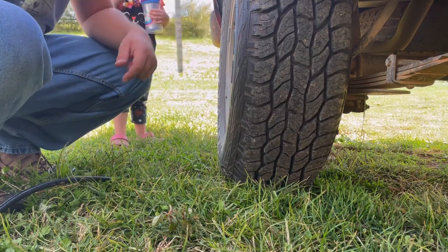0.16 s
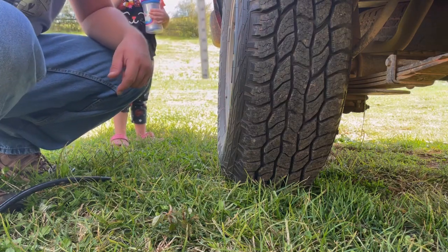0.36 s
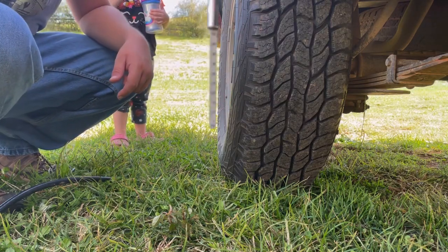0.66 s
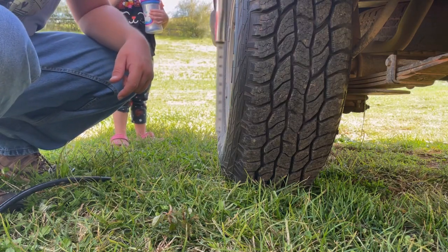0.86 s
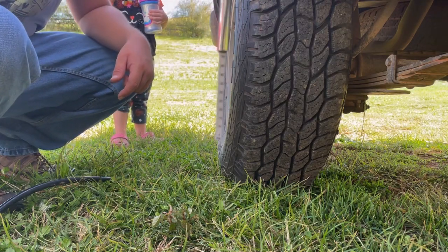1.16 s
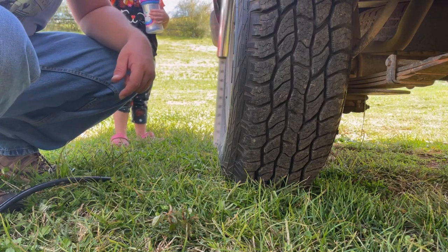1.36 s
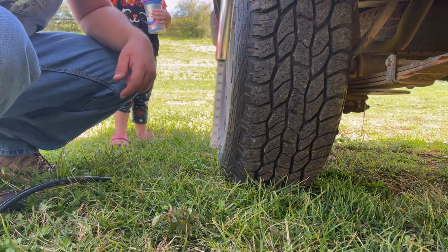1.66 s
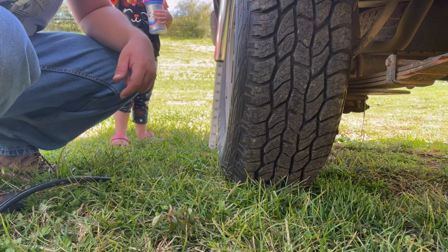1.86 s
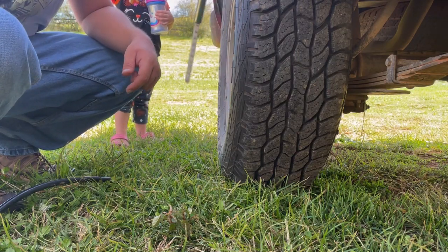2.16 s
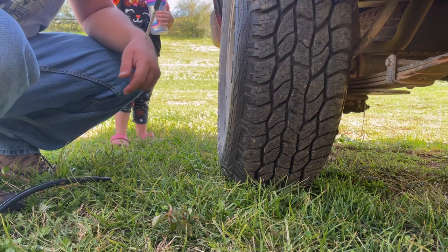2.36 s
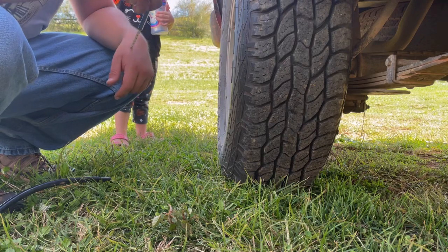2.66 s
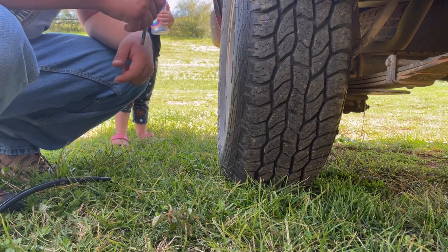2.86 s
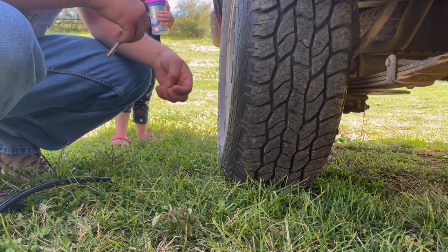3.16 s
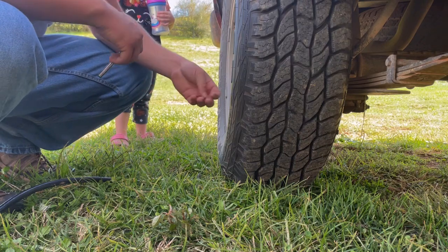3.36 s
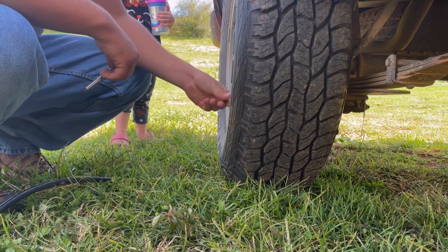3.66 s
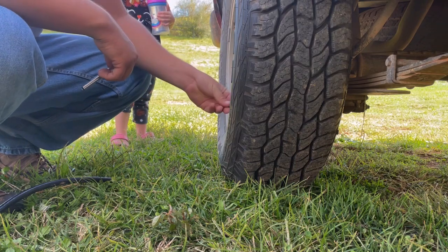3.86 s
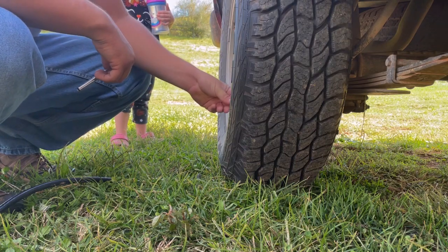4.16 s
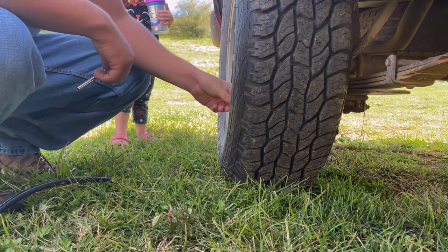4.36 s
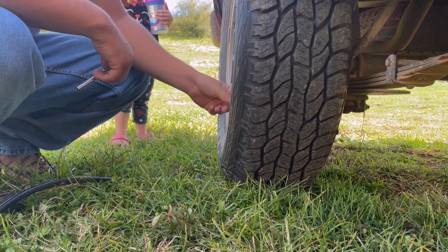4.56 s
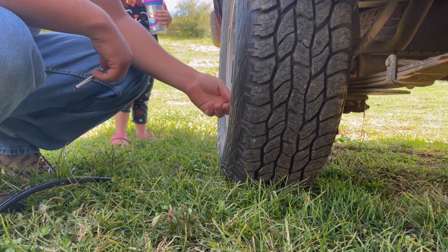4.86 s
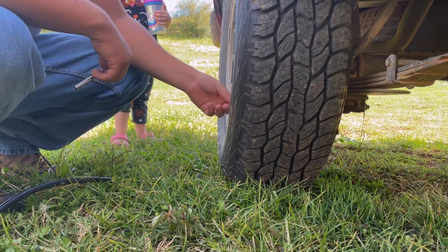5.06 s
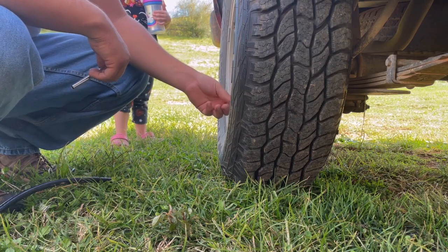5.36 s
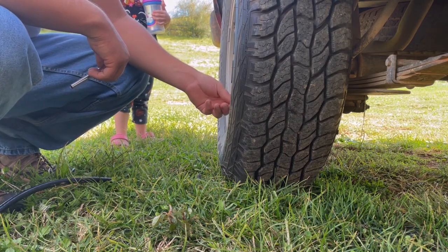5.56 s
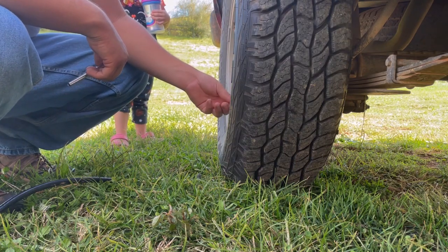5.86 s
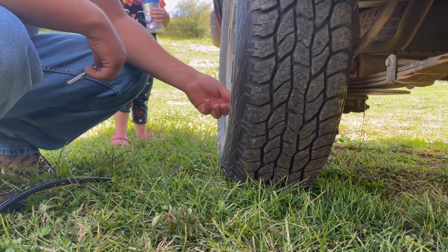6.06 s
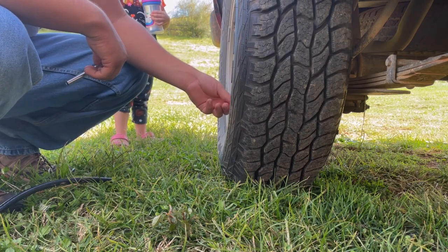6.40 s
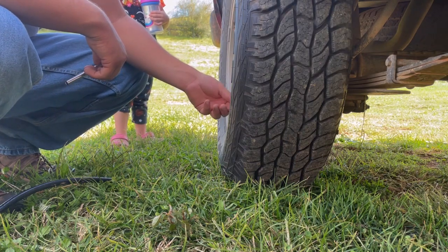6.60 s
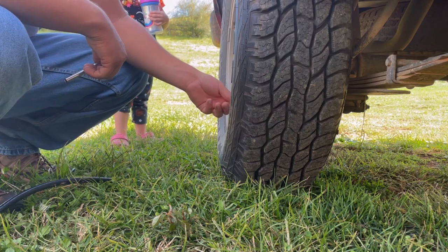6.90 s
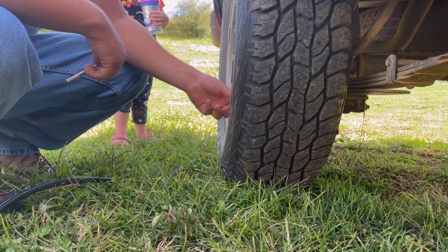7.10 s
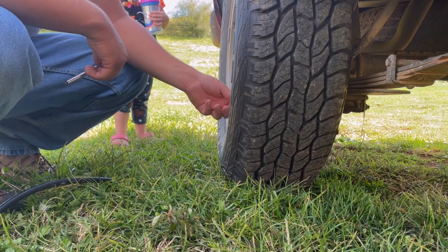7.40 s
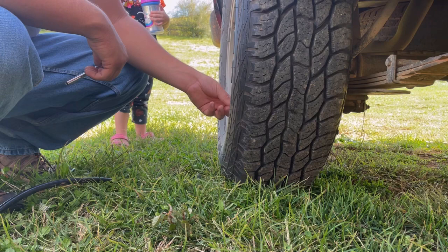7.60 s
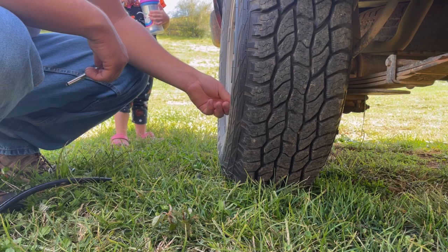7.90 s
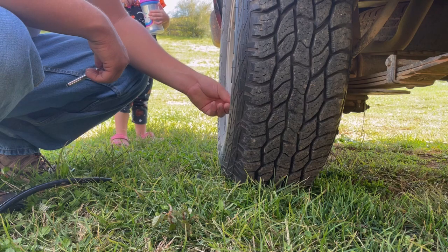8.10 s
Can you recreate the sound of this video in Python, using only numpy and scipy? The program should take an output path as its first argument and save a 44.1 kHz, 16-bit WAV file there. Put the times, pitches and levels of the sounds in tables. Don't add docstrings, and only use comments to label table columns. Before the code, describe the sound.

From 0 to about 8 seconds a small piston air compressor runs steadily on grass, close to a phone and slightly left. It turns about 47 times a second, giving a low, dense hum near 94 Hz with stacked buzzing overtones, housing rumble, loose rattle and pulsing valve and fan hiss; speed barely sags. Wind puffs the microphone at 0.15, strongest at 0.6, again at 1.4 and 2.0. One midrange tone near 600 Hz swells slightly at 0.55 and 1.55. Five tiny falling chirps near 4.4 kHz quicken past from 1.34 to 1.54, growing louder. A faint, very high insect rasp sings from 2.3 to 4.5, with dry ticks around 3.0 to 3.2 and 3.9 to 4.0. As a person leans in, roughly 2 to 3, the buzz brightens subtly. A short puff comes at 3.9, lone chirps at 5.2 and 6.3, soft gusts near 5.9 and 7, and fainter rasping from 7.0 to 8.6. Faint field hiss underlies everything.

```python
import sys
import numpy as np
from scipy import signal
from scipy.fft import rfft, irfft, next_fast_len
from scipy.io import wavfile
from scipy.ndimage import uniform_filter1d

SR = 44100
rng = np.random.default_rng(int(sys.argv[2]) if len(sys.argv) > 2 else 0)


def int16_out(signal):
    q = np.round(np.clip(np.atleast_2d(signal).T, -1, 1) * 32767)
    wavfile.write(sys.argv[1], SR, q.astype(np.int16))


def gain_from_decibels(decibels):
    exponent = np.asarray(decibels, float) / 20
    return 10 ** exponent


N = 363384


def unit(x):
    return x / np.sqrt(np.mean(np.abs(x) ** 2) + 1e-20)


def along(points, hz):
    f, v = np.transpose(points)
    return np.interp(np.log(hz + 1), np.log(f + 1), v)


def curve(rows):
    return np.interp(np.arange(N) / SR, *np.transpose(rows))


def wobble(rate):
    knots = rng.standard_normal(400)
    return np.interp(np.arange(N) * (min(rate, 40) / SR), np.arange(len(knots)), knots)


def filtered(x, response):
    m = next_fast_len(N + 8192)
    return irfft(rfft(x, m) * response(np.fft.rfftfreq(m, 1 / SR)), m)[..., :N]


# frequency in Hz, lead in radians.
LEFT_LEAD = [(0, 0), (340, -0.5), (690, -2.1), (950, -1.4), (1810, -1.4), (2150, -0.5), (2930, -1.5),
             (3620, -2.0), (3880, -0.6), (4390, -1.7), (4740, -1.4), (5680, -3.1), (6550, -2.1),
             (6980, -2.8)]
# frequency in Hz, left over right in dB.
LEFT_LEAN = [(60, -3), (100, -1), (170, -3.5), (290, 3.5), (490, 2), (830, -1.5), (1400, 4.5), (2370, 9),
             (4010, -3), (6780, 1)]
# frequency in Hz, likeness from 0 to 1.
LIKENESS = [(60, 1), (250, 0.98), (700, 0.66), (2500, 0.25), (6000, 0.42)]


def rush(spectrum, throb):
    common, differing = rng.standard_normal((2, N)) * throb

    def turn(hz):
        return np.arccos(np.clip(along(LIKENESS, hz), 0, 1)) / 2

    def port(hz, side):
        lean = gain_from_decibels(side * along(LEFT_LEAN, hz) / 2)
        return gain_from_decibels(along(spectrum, hz)) * lean * np.exp(.5j * side * along(LEFT_LEAD, hz))

    ports = []
    for side in (1, -1):
        same = filtered(common, lambda hz: np.cos(turn(hz)) * port(hz, side))
        other = filtered(differing, lambda hz: np.sin(turn(hz)) * port(hz, side))
        ports.append(same + side * other)
    return unit(np.array(ports))


# frequency in Hz, level in dB.
HISS_SHARED = [(6000, -120), (7000, -14), (8300, -12), (8800, -15.5), (9400, -12), (11000, -13),
               (12500, -16), (13600, -21), (14300, -27), (15500, -25), (16500, -120)]
# frequency in Hz, level in dB.
HISS_DIFFERING = [(6000, -120), (7200, -7), (7900, 1.5), (8500, 1.5), (9300, -9), (10300, -17),
                  (11300, -32), (12500, -18), (14000, -15), (15500, -10), (16500, -120)]


def air():
    mid = filtered(rng.standard_normal(N), lambda hz: gain_from_decibels(along(HISS_SHARED, hz) - 50.8))
    side = filtered(rng.standard_normal(N), lambda hz: gain_from_decibels(along(HISS_DIFFERING, hz) - 50.5))
    return np.array([mid + side, mid - side])


# start in seconds, end in seconds, level in dB.
BOUTS = [
    (2.3, 4.52, -67.5),
    (7.0, 7.6, -74),
    (7.5, 8.6, -70),
]


def insect_rasp():
    t = np.arange(N) / SR
    beat = gain_from_decibels(7 * np.cos(2 * np.pi * 60 * t + 1.5 * wobble(8)) + 1.5 * wobble(20))
    rasp = filtered(rng.standard_normal(N) * beat, lambda hz: np.exp(-((hz - 15600) / 350) ** 2))
    swell_s = .15
    bouts = sum(gain_from_decibels(db) * np.clip(np.minimum(t - a, b - t) / swell_s, 0, 1) for a, b, db in BOUTS)
    chorus = gain_from_decibels(-80 + 3 * wobble(5))
    return (bouts + chorus) * unit(rasp) * np.array([[1.2], [-.3]])


# time in seconds, peak level in dB.
TICKS = [
    (2.9934, -60),
    (3.0729, -56),
    (3.1587, -58),
    (3.8736, -58),
    (4.0257, -59),
]


def insect_ticks():
    t = np.arange(N) / SR
    snaps = sum(gain_from_decibels(db) * np.exp(-((t - s) / 0.0017) ** 2) for s, db in TICKS) * rng.standard_normal(N)
    return filtered(snaps, lambda hz: 2.8 * np.exp(-((hz - 14500) / 1800) ** 2)) * np.array([[1.3], [.2]])


# time in seconds, peak level in dB, pitch in Hz.
CHIRPS = [
    (1.3428, -49, 4490),
    (1.3927, -46, 4290),
    (1.4386, -43.5, 4500),
    (1.488, -42, 4370),
    (1.5404, -40, 4400),
    (5.1771, -43, 4500),
    (6.315, -41, 4360),
]


def chirps():
    t = np.arange(N) / SR
    out = np.zeros((2, N))
    for s, db, hz in CHIRPS:
        u = t - s - .002
        whistle = np.sin(2 * np.pi * u * ((hz + 4420) / 2 - 8000 * u))
        out += gain_from_decibels(db - 1) * np.exp(-(u / .0035) ** 2) * whistle * np.array([[1.1], [.9]])
    return out


# middle in seconds, half length in seconds, peak level in dB.
GUSTS = [
    (.15, 0.2, -35),
    (.62, 0.32, -27),
    (1.4, 0.28, -35),
    (2.0, 0.22, -34),
    (3.1, 0.76, -42),
    (3.948, 0.22, -35),
    (5.9, .35, -40),
    (7.0, .5, -41),
]


def wind():
    shape = [(25, -41), (45, -9), (70, 1.0), (90, 3.5), (140, -9.5), (300, -120)]  # (Hz, dB)
    t = np.arange(N) / SR
    calm = gain_from_decibels(-5 - 61.5)
    gusts = calm + sum(gain_from_decibels(db - 5.5) * np.exp(-((t - s) / half) ** 2) for s, half, db in GUSTS)
    buffet = rush(shape, 1)
    apart = 0.25 * buffet[:, ::-1] * [[1], [-1]]
    return gusts * unit(gain_from_decibels(0.73 * wobble(13)) * (buffet + apart))


# frequency in Hz, level in dB per Hz.
HOUSING = [(15, -30), (25, -24), (43, -34), (69, -7), (96, -6.5), (115, -4.5), (141, -16), (204, -4.5),
           (237, 1), (277, -13), (339, -4), (430, -14), (466, -18), (518, -19), (600, -27.5), (780, -59),
           (1320, -120)]


def housing_rumble():
    return gain_from_decibels(-36.5) * gain_from_decibels(0.66 * wobble(6.5)) * rush(HOUSING, 1)


def clumpy(x):
    z = signal.stft(x, nperseg=512)[2]
    field = uniform_filter1d(rng.standard_normal(z.shape[1:]), size=4, axis=0)
    field = uniform_filter1d(field, size=6, axis=1)
    return unit(signal.istft(z * gain_from_decibels(2 * unit(field)), nperseg=512)[1][:, :N])


# frequency in Hz, level in dB per Hz.
VALVES = [(330, -31), (500, -4), (650, -0.5), (820, -0.5), (1150, -6), (1420, -4), (1640, 0.5), (1850, -4),
          (2040, -2), (2280, -6), (2480, -5.5), (2700, -13.5), (3100, -32), (3600, -120)]
# frequency in Hz, level in dB per Hz.
FAN = [(2300, -120), (2700, -20), (2950, -14.5), (3300, -14), (3600, -15), (3900, -16.5), (4150, -21.5),
       (4450, -10.5), (4800, -17), (5400, -16.5), (5800, -18.5), (6500, -20.5), (7200, -23), (8500, -50)]


def valves_and_fan(crank):
    stroke = gain_from_decibels(2 * np.cos(crank) + 1.4 * np.cos(3 * crank + 1.1) + .7 * wobble(22))
    valves = gain_from_decibels(-39.5) * clumpy(rush(VALVES, stroke))
    fan = gain_from_decibels(-50.5) * rush(FAN, np.sqrt(stroke))
    return gain_from_decibels(.35 * wobble(4)) * (valves + fan)


def tone(phase, db, pan_db, lead, drift_db, slip, rate):
    turning = phase + slip * wobble(rate)
    level = 2 * gain_from_decibels(db) * unit(gain_from_decibels(drift_db * wobble(rate))) / np.sqrt(gain_from_decibels(pan_db) + gain_from_decibels(-pan_db))
    return level * np.array([gain_from_decibels(s * pan_db / 2) * np.sin(turning + s * lead / 2) for s in (1, -1)])


# level in dB, left over right in dB.
HALF_ORDERS = [(-69, -2.5), (-54.5, -5), (-54, 16), (-83, 4), (-53, 10), (-55, -11), (-55, 31), (-55, 11),
               (-56, -7), (-62, 8), (-69, -14), (-62, -10)]


def half_orders(crank, turns_hz):
    out = np.zeros((2, N))
    for k, (db, pan_db) in enumerate(HALF_ORDERS, 1):
        order = k + .5
        phase = order * crank + rng.uniform(0, 2 * np.pi)
        lead = along(LEFT_LEAD, order * turns_hz)
        out += tone(phase, db + 2.5, pan_db, lead, drift_db=7.5, slip=1.23, rate=9)
    return out


# level in dB, left over right in dB,
# left lead in radians, change in dB once the echoes shift.
PISTON = [(-49, 0, .2, 2), (-34, 0, -.2, -1), (-46, 9, 0, -1), (-39, 3, -.4, 2), (-37, -1, -.4, 0),
          (-46, 5, -1, 0), (-42, 4, .1, 0), (-46, -1, -1.2, 1), (-48, 1, -.5, 3), (-57, -10, -2.2, 2),
          (-52, 8, -1.2, 2), (-54, -6, -.8, 2), (-57.5, 1, .2, -2), (-55, 0, -2.1, 0), (-55, 3, -2.6, -5),
          (-54, 19, -1.8, 3), (-48, 0, -2.4, 4), (-48.7, -1, -.7, 0), (-52, -1, -.8, 4)]
RINGING = {23: (-57.5, -1, 5), 26: (-57, 3, 5), 31: (-58, 5, 9), 40: (-56, 8, -1), 45: (-54.5, 8, -10),
           46: (-56.5, 6, 1), 47: (-59, 7, 7), 49: (-59, 11, 8), 64: (-68, 4, 2), 79: (-72, 0, -7),
           83: (-68, 2, 10), 85: (-71, 5, -3), 86: (-71, 2, 8), 95: (-69, -2, -1), 96: (-68, -2, 9)}
# frequency in Hz, level in dB.
RATTLE = [(900, -63), (1150, -57.5), (1400, -64), (2000, -65.5), (2500, -67), (2800, -73.5), (3700, -79.5),
          (4400, -72.5), (4750, -78), (5300, -78.5)]


def orders(turns_hz):
    rows = [(k, *row) for k, row in enumerate(PISTON, 1)]
    for k in range(len(PISTON) + 1, 108):
        hz = k * turns_hz
        luck = rng.standard_normal(4)
        lead = along(LEFT_LEAD, hz)
        if k in RINGING:
            db, pan_db, change_db = RINGING[k]
        else:
            db = along(RATTLE, hz) + 3 * luck[0]
            pan_db = along(LEFT_LEAN, hz) + 4 * luck[1]
            change_db = 4 + 3.5 * luck[2]
            lead = lead + .6 * luck[3]
        if db >= -76:
            rows.append((k, db, pan_db, lead, change_db))
    return rows


# time in seconds, share of the change.
SHIFT = [
    (0, -.75),
    (1.9, -.7),
    (3.2, .2),
    (8.24, .5),
]
ROD = [
    .55,
    1.55,
]


def shaft_orders(crank, turns_hz):
    shift = curve(SHIFT)
    rod_half_s = .27
    rod = sum(np.exp(-((np.arange(N) / SR - s) / rod_half_s) ** 4) for s in ROD)
    out = np.zeros((2, N))
    for k, db, pan_db, lead, change_db in orders(turns_hz):
        loose = min(k / 55, 1)
        spread = .1 if 2 <= k <= 8 else 1
        if k > 24:
            spread = .75
        start = -np.pi / 2 + 2.5 * (k in (2, 7, 8)) + rng.uniform(-np.pi, np.pi) * spread
        sway_db = 1.7 * min(k / 12, 1) ** 2 * wobble(1.1)
        if 44 <= k <= 47:
            sway_db = sway_db + 3.2 * wobble(40)
        if k == 13:
            sway_db = sway_db + 7 * rod
        level_db = db + .6 + 2.4 * loose + .75 * change_db * shift + sway_db
        out += tone(k * crank + start, level_db, pan_db, lead,
                    drift_db=.8 + 2 * loose, slip=.08 + .25 * loose, rate=8 + 16 * loose)
    return out


# time in seconds, frequency in Hz.
SPEED = [
    (0.2, 843.2),
    (8.1, 840.6),
]


def compressor():
    turns_hz = curve(SPEED) / 18
    crank = 2 * np.pi * np.cumsum(turns_hz) / SR + .012 * wobble(5)
    hum = shaft_orders(crank, turns_hz[0]) + half_orders(crank, turns_hz[0])
    return hum + housing_rumble() + valves_and_fan(crank)


def scene():
    return air() + insect_rasp() + insect_ticks() + chirps() + wind() + compressor()


def low_pass(x):
    return signal.sosfilt(signal.butter(12, 15790, fs=SR, output="sos"), x)


def record(dry):
    return low_pass(dry)


dry = scene()
out = record(dry)
int16_out(out)
```